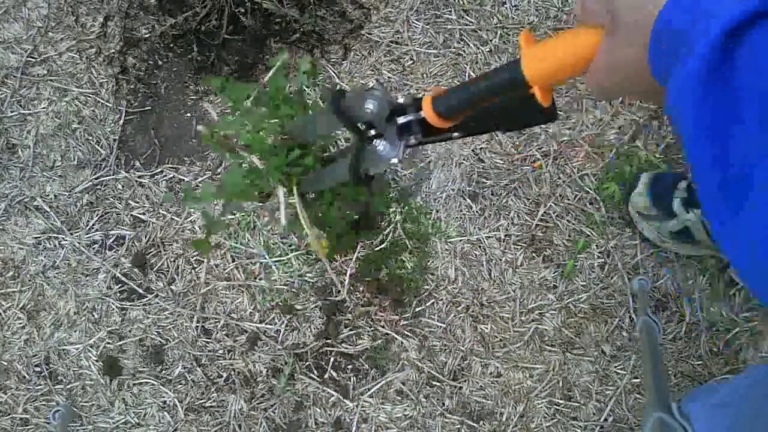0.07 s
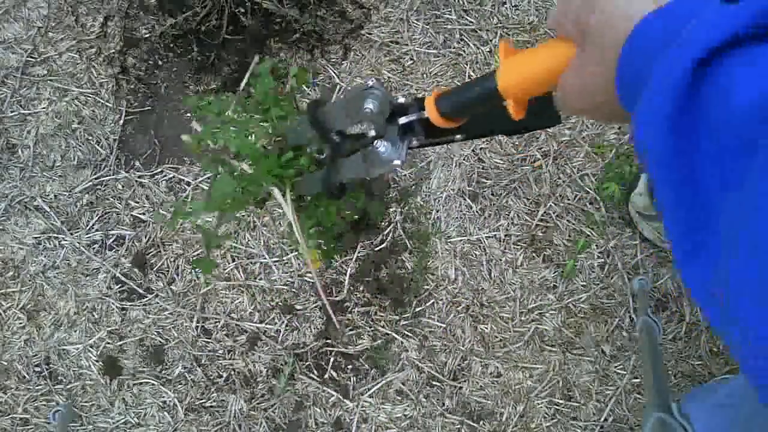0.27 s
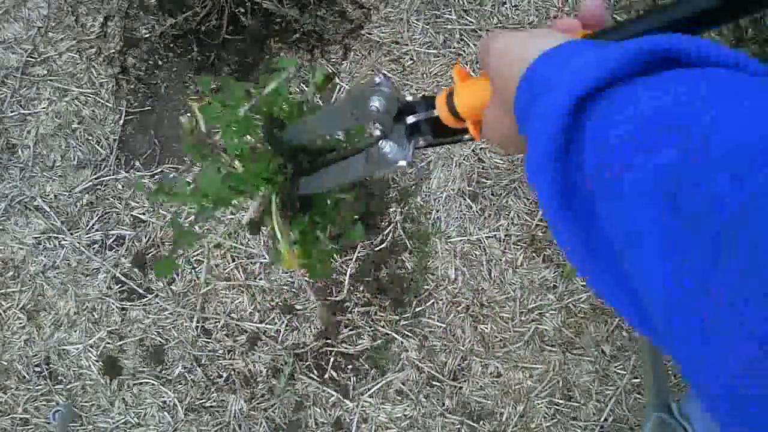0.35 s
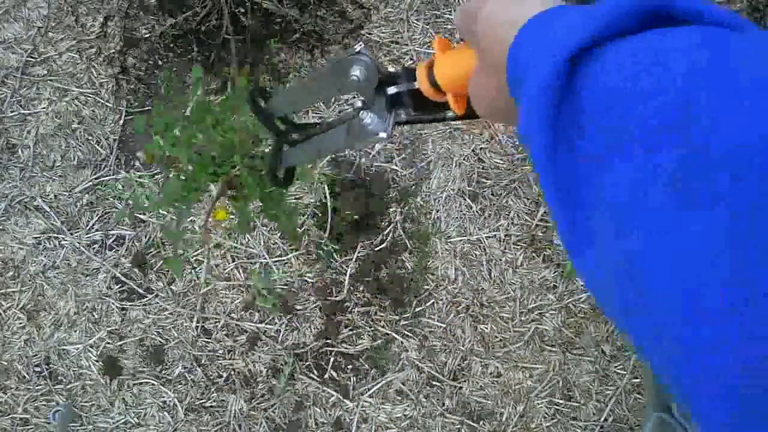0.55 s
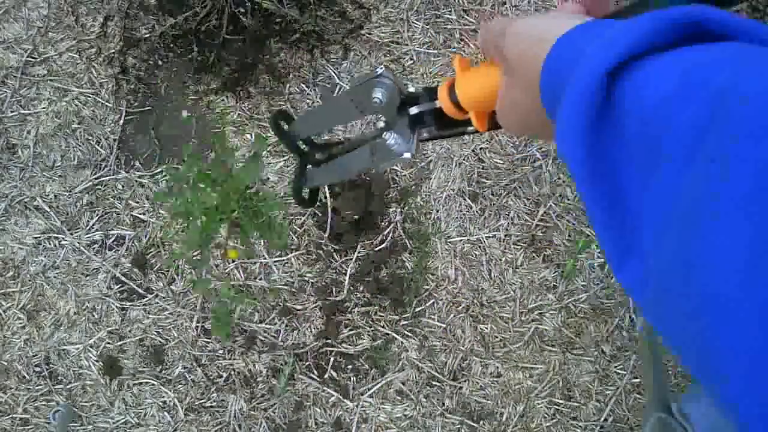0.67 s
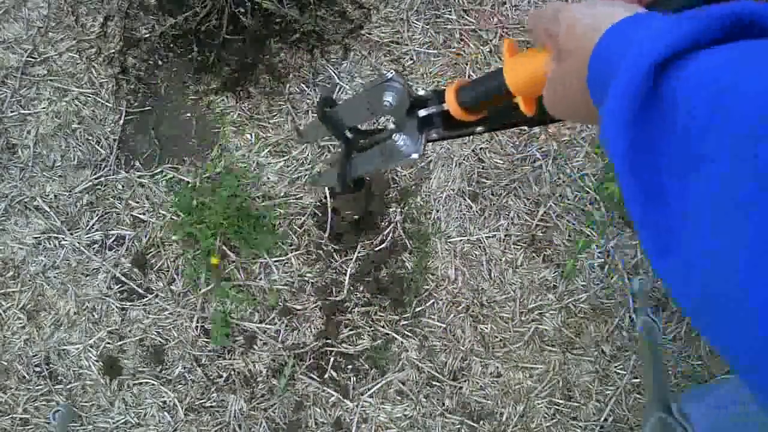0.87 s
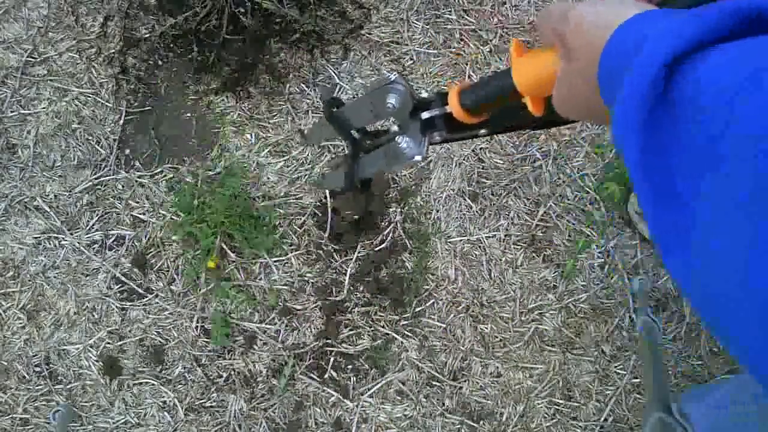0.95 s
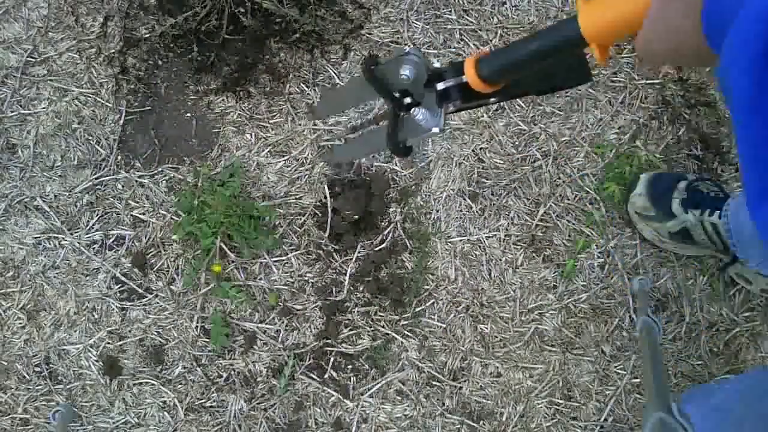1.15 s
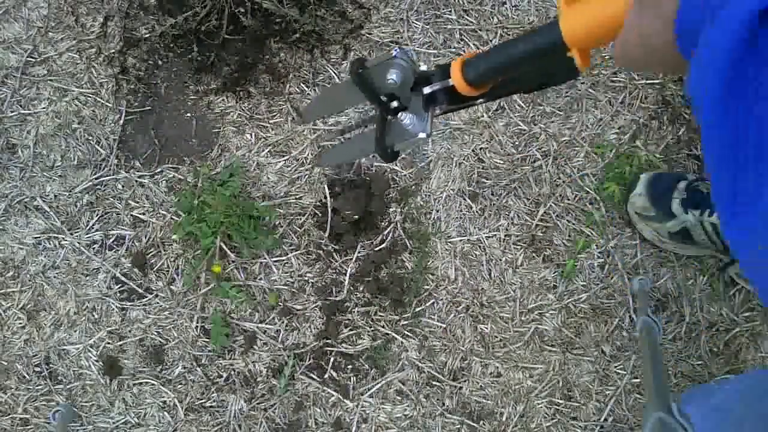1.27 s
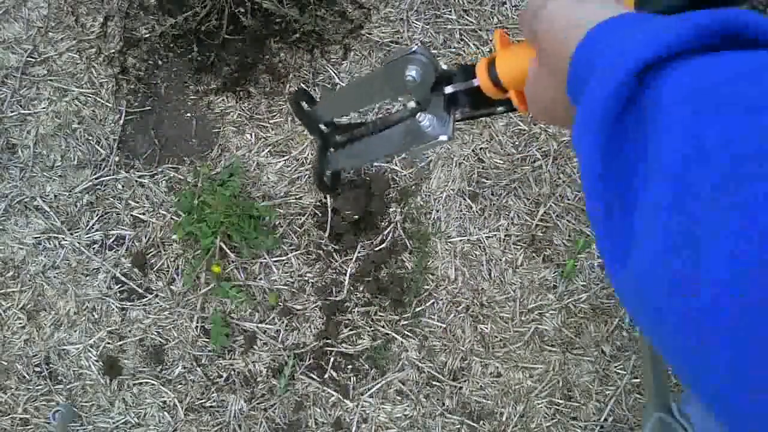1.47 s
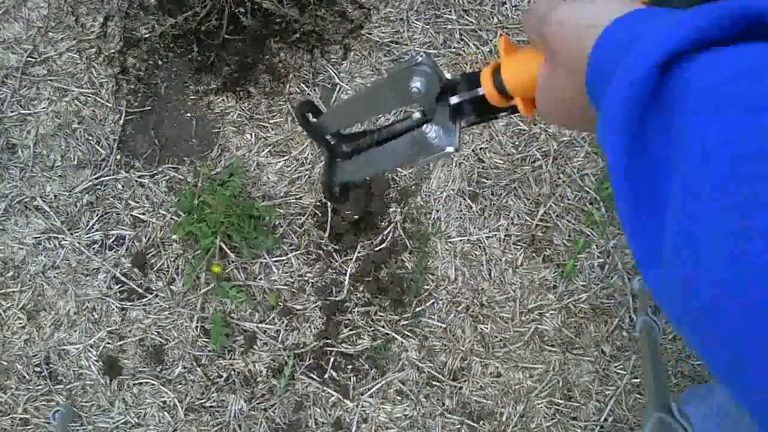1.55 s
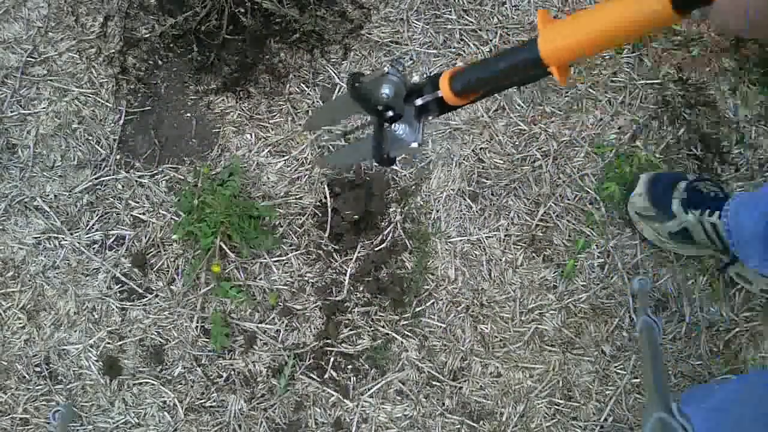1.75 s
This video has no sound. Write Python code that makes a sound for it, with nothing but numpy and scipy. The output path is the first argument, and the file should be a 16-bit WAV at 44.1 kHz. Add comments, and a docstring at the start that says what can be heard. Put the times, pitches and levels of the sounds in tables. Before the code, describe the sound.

A metal stand-up weeder's sliding grip clacks hard four times, with scraping hisses and rattles outdoors

```python
"""Outdoors on dry grass, close to the microphone, a steel stand-up weeder is pumped twice.
Its grip hisses along the shaft (patchy coloured noise) and slams or latches (short modes and noise bursts).
Loose parts rattle (short noise bursts) and the shaft rings on (damped sines); the last latch has a squeak.
The weed and its soil drop as low sine thuds and ticks of noise; a faint blur widens the tool over quiet air.
The four hard clacks overload the recorder, which limits and clips them."""
import sys
import numpy as np
from scipy import signal
from scipy.fft import rfft, irfft, next_fast_len
from scipy.io import wavfile
from scipy.ndimage import uniform_filter1d, minimum_filter1d, map_coordinates

SR = 44100
rng = np.random.default_rng(int(sys.argv[2]) if len(sys.argv) > 2 else 0)


def transcribe(u):
    """Save the signal u as a 16-bit wav file named by the first command-line argument.

    u: samples, shape (n,) or (channels, n), limited to [-1, 1]; the rate is SR.
    q: integer samples, one column per channel.
    """
    v = np.clip(np.atleast_2d(u).T, -1, 1)
    q = np.round(v * 32767).astype(np.int16)
    wavfile.write(sys.argv[1], SR, q)


N = 79380  # samples, 1.8 s


def amp(db):
    """Amplitude factor of a level in dB."""
    return 10 ** (np.asarray(db) / 20)


def unit(x):
    """Scale a signal to rms 1."""
    return x / np.sqrt(np.mean(x ** 2) + 1e-20)


def fade(t, t60):
    """Exponential decay, 60 dB in t60 seconds."""
    return np.exp(-np.log(1000) * t / t60)


def tilted(hz, tilt_db):
    """Gain of a slope in dB per octave about 4 kHz, level below 1500 Hz."""
    return amp(tilt_db * np.log2(np.maximum(hz, 1500) / 4000))


def filtered(x, response):
    """Multiply the spectrum of x by a response of frequency, padded against wrap-around."""
    n = x.shape[-1]
    padded = next_fast_len(n + 8192)
    spectrum = rfft(x, padded) * response(np.fft.rfftfreq(padded, 1 / SR))
    return irfft(spectrum, padded)[..., :n]


def noise(spectrum, size, tilt_db=0):
    """Noise of rms 1, coloured by points of f/Hz and level/dB joined over log frequency."""
    f, db = np.transpose(spectrum)

    def colour(hz):
        return amp(np.interp(np.log(hz + 1), np.log(f + 1), db)) * tilted(hz, tilt_db)

    return unit(filtered(rng.standard_normal(size), colour))


def patchy(x, depth_db):
    """Lay drifting patches of gain, some 700 Hz by 30 ms, over a sound."""
    z = signal.stft(x, nperseg=256)[2]
    field = uniform_filter1d(rng.standard_normal(z.shape), size=4, axis=0)  # across frequency
    field = uniform_filter1d(field, size=10, axis=1)  # across time
    return signal.istft(z * amp(depth_db * unit(field)), nperseg=256)[1][:N]


def add(track, s, sound):
    """Mix a sound into the track at time s, cut at the track's end."""
    part = track[round(s * SR):][:len(sound)]
    part += sound[:len(part)]


# colour of the outdoor air: f/Hz, level/dB (per Hz, relative)
AIR_COLOUR = [(15, -33), (25, 8.5), (93, -3.5), (318, -7), (450, -6.5), (833, -11.5), (903, -12.5),
              (1030, -12), (1350, -16), (1460, -16.5), (2180, -25), (3730, -23.5), (4870, -26.5),
              (12800, -26.5), (15000, -37)]
AIR_DB = -50
AIR_SIDE_DB = -21  # relative to AIR_DB


def air():
    """Quiet outdoor air: steady coloured noise, with a fainter independent side signal for width."""
    mid = amp(AIR_DB) * noise(AIR_COLOUR, N)
    side = amp(AIR_DB + AIR_SIDE_DB) * noise(AIR_COLOUR, N)
    return np.array([mid + side, mid - side])


# soft thuds of soil and handling: t/s, level/dB (before doubling), f/Hz, t60/s
THUD_EVENTS = [(.004, -43, 152, 0.036), (0.1, -43.5, 139, 0.097), (.133, -40.5, 125.3, 0.061),
               (0.155, -37, 192, 0.033), (0.2395, -49, 200, 0.032), (0.3392, -26.5, 270, 0.015),
               (0.3547, -33, 195, 0.035), (0.368, -36, 130, 0.058), (0.409, -44, 113, 0.1),
               (0.602, -33.5, 143.5, 0.038), (.674, -37.5, 138, 0.039), (1.134, -47, 112, 0.11),
               (1.455, -44.5, 89, 0.095), (1.504, -38.5, 127, 0.046)]
THUD_RISE_S = 0.00086  # time constant of the onset


def thuds():
    """Soft low bumps, damped sines with a rounded onset; the strongest are the root ball landing."""
    out, t = np.zeros(N), np.arange(SR // 4) / SR
    onset = 1 - np.exp(-t / THUD_RISE_S)
    for s, db, hz, t60 in THUD_EVENTS:
        bump = np.sin(2 * np.pi * hz * t) * fade(t, t60) * onset
        add(out, s, 2 * amp(db) * bump)
    return out


# the grip slides on the shaft, one list a stroke: t/s, hiss level/dB, hollow midrange level/dB
GRIP_STROKES = [
    [(.14, -60, -70), (.185, -46.5, -49.5), (.203, -30.5, -41.5), (.24, -29, -35), (.26, -41, -43),
     (.33, -65, -44), (.5, -57.5, -60.5)],
    [(.62, -56, -59.5), (.665, -45.5, -51.5), (.69, -38.5, -46.5), (.715, -42.5, -52), (.79, -46.5, -50),
     (.86, -58.5, -65)],
    [(.875, -65, -72), (.905, -49, -53.5), (.932, -38, -42), (.96, -34, -50.5), (.98, -47, -52),
     (1.02, -49, -81), (1.07, -69, -64)],
    [(1.2, -59, -66), (1.225, -45.5, -49), (1.255, -31.5, -31.5), (1.28, -36.5, -41.5), (1.305, -42, -46),
     (1.345, -85, -51)],
    [(1.465, -67, -57), (1.495, -44.5, -50), (1.55, -35.5, -39), (1.6, -34.5, -78), (1.66, -36, -40.5),
     (1.71, -41.5, -59), (1.8, -41, -56)],
]
# colour of the hiss before its treble filter: f/Hz, level/dB (per Hz, relative)
HISS_COLOUR = [(1760, -45), (3000, 4), (3610, -13), (4090, -13), (7430, 0.5), (8010, 0), (8640, 0),
               (11000, -3.5), (12300, -5), (14800, -8.5), (15500, -14.5)]
# colour of the hollow tube: f/Hz, level/dB (per Hz, relative)
HOLLOW_COLOUR = [(300, -25.5), (900, -3), (1600, -3), (2200, -3), (3200, -3), (4300, -0.5), (6300, 1),
                 (8000, -25), (14000, -14.5)]
HISS_EDGE_HZ = 5800  # the hiss is 6 dB down here
PATCH_DB = 1.6  # rms depth of the gain patches
GRIT_DB, GRIT_RATE = 1.5, 260  # scatter of the level in dB, random points per second


def slide():
    """Plastic rubs on the gritty shaft: a bright hiss over the hollow sound of the tube."""
    t = np.arange(N) / SR
    hiss_gain, hollow_gain = np.zeros(N), np.zeros(N)
    for stroke in GRIP_STROKES:
        s, hiss_db, hollow_db = np.transpose(stroke)
        to_edge = np.minimum(t - s[0], s[-1] - t)
        inside = np.clip(to_edge / .02 + 1, 0, 1)  # 20 ms ramps outside the stroke
        hiss_gain += inside * amp(np.interp(t, s, hiss_db))
        hollow_gain += inside * amp(np.interp(t, s, hollow_db))
    hiss = patchy(noise(HISS_COLOUR, N), PATCH_DB)
    hiss = unit(filtered(hiss, lambda hz: hz ** 2 / (hz ** 2 + HISS_EDGE_HZ ** 2)))
    hollow = patchy(noise(HOLLOW_COLOUR, N), PATCH_DB)
    roughness = map_coordinates(rng.standard_normal(N // 10), [t * GRIT_RATE], mode="wrap")
    grit = unit(amp(GRIT_DB * roughness))
    return grit * (hiss_gain * hiss + hollow_gain * hollow)


# loose parts rattle and bounce: t/s, level/dB, tilt/dB per octave, t60/s
RATTLE_EVENTS = [(0.1536, -35.5, -6.5, 0.013), (0.2032, -30.5, -1, 0.016), (0.2712, -18.5, -1, .022),
                 (0.2847, -27, -16, 0.023), (0.291, -26, 7, .03), (0.3052, -27.5, -16, 0.038),
                 (0.3097, -25, 7, .015), (0.354, -35.5, 2, 0.027), (.3655, -36.5, -3, 0.03),
                 (0.61, -39, 13, 0.036), (.6175, -30, 24, .008), (.692, -42.5, -11, 0.01),
                 (0.7223, -41, 9, .01), (0.9747, -36, 5, .012), (.997, -40, 2, 0.035),
                 (1.2552, -17, -2.5, 0.011), (1.296, -20, 17, 0.036), (1.3184, -21.5, -4.5, 0.028),
                 (1.3565, -19.5, 14, 0.0075), (1.367, -31.5, -3, 0.009), (1.386, -38.5, -11, 0.025),
                 (1.4005, -38.5, -7, 0.027), (1.4125, -40, -9, 0.024), (1.5597, -21, -1, 0.0091),
                 (1.5785, -17, -15, 0.0035), (1.608, -29.5, 2, 0.038), (1.638, -34.5, -4, .04),
                 (1.651, -27, 17, 0.028), (1.665, -32, 14, .02)]
# colour of a small contact before tilting: f/Hz, level/dB (per Hz, relative)
RATTLE_COLOUR = [(200, -40.5), (800, -18.5), (1500, 0.5), (2200, -2.5), (3200, 4.5), (4300, 6),
                 (5500, -5.5), (8500, -1), (12000, -7.5), (15000, -15.5)]


def rattles():
    """Small contacts of claws, linkage and grit: decaying noise bursts, each dull or bright."""
    out, t = np.zeros(N), np.arange(SR // 10) / SR
    for s, db, tilt_db, t60 in RATTLE_EVENTS:
        burst = noise(RATTLE_COLOUR, len(t), tilt_db) * fade(t, t60)
        add(out, s, amp(db) * burst)
    return out


CRUMB_START_S, CRUMB_SPREAD_S, CRUMB_T60 = 0.17, 0.14, 0.011
CRUMB_DB, CRUMB_SCATTER_DB = -39.5, 3  # level before the later ones grow fainter, and its scatter


def crumbs(count=30):
    """Crumbs shaken off the claws patter on the dry grass as noise ticks, ever fewer and fainter."""
    out, t = np.zeros(N), np.arange(SR // 50) / SR
    for wait, size, tilt_db in rng.standard_normal((count, 3)):
        wait = abs(wait)
        tick = noise(RATTLE_COLOUR, len(t), tilt_db) * fade(t, CRUMB_T60)
        level = amp(CRUMB_DB + CRUMB_SCATTER_DB * size) * np.exp(-wait / 2)
        add(out, CRUMB_START_S + CRUMB_SPREAD_S * wait, level * tick)
    return out


# where a blow can strike, in the order of the level columns of the modes
STRIKE_PLACES = ["full claws", "empty claws", "latch"]
WANDER_RATE = 120  # random phase points per second


def ring(modes, place, t, length, wander):
    """Damped sines driven as the struck place allows; loose joints make their phase wander (radians)."""
    column, out = STRIKE_PLACES.index(place), np.zeros(len(t))
    for k, (hz, t60, *levels) in enumerate(modes):
        drift = map_coordinates(rng.standard_normal(len(t) // 100), [t * WANDER_RATE])
        sine = np.sin(2 * np.pi * hz * t + wander * drift)
        polarity = (-1) ** k
        out += polarity * amp(levels[column]) * fade(t, t60 * length) * sine
    return out


# hard contacts and their rebounds: t/s, place struck, level/dB, length of the blow (factor), ring level/dB
BLOW_EVENTS = [(.2413, "full claws", 3.5, 1.31, -31.5), (0.2751, "full claws", -16, 0.9, -40.5),
               (0.9636, "latch", -2.5, 0.87, -50.5), (1.2877, "empty claws", 2, 1.2, -32),
               (1.3221, "empty claws", -21, 1.5, -51), (1.5744, "latch", 2, 0.96, -40.5)]
# short modes of head and grip: f/Hz, t60/s (before the length factor), level/dB for each place
HEAD_MODES = [(850, .005, -28, -18, -34), (1480, .014, -15, -14, -32), (1690, .015, -11, -9, -26),
              (2150, .008, -18, -10, -17), (2650, .009, -13, -9, -13), (3600, .008, -13, -6, -12),
              (4290, .01, -1, -17, -16), (6600, .006, -9, -9, -3), (7050, .008, -18, -20, -1),
              (7500, .008, -14, -11, -4), (8400, .011, -9, -15, -18), (10300, .005, -6, -9, -9),
              (11900, .006, -10, -8, -17), (14000, .005, -7, -16, -13)]
# long modes of the shaft: f/Hz, t60/s, level/dB for each place
SHAFT_MODES = [(1405, .34, -12, -15, -25), (1696, .46, 0, -9, -18), (2939, .38, -4, -3, -3),
               (2972, .18, -11, 3, -7), (3500, .16, -13, -8, -5), (4215, .34, -4, -11, -12),
               (4452, .38, -9, -15, -14), (5798, .25, -18, -18, -18), (6900, .12, -16, -11, -7),
               (8400, .14, -6, -11, -8), (8630, .14, -7, -16, -6), (9259, .1, -12, -7, -12)]
# colour of the crack: f/Hz, level/dB (per Hz, relative)
CRACK_COLOUR = [(100, -32), (400, -17), (900, -7), (1700, -2), (3000, 1), (4200, 0), (5000, -4), (6000, 0),
                (10000, 1), (15000, -1)]
# dense shudder of the whole tool: f/Hz, level/dB (per Hz, relative)
SHUDDER_COLOUR = [(200, -40), (800, -2.5), (1200, -11.5), (1650, -2), (2200, -0.5), (3000, 4.5), (3600, 0),
                  (4350, -20), (5200, -4), (7000, -7.5), (8500, -2.5), (12000, -12.5), (15000, -13)]
RING_S, RING_WANDER = .7, .7  # seconds computed; phase wander in radians
# levels relative to the blow, t60 before its length factor
CRACK_DB, CRACK_T60 = -8, .01
SHUDDER_DB, SHUDDER_T60 = -20.5, 0.042
TAIL_DB, TAIL_T60 = -3, 0.46  # level relative to the ring, t60 as it is


def clacks():
    """A hard contact: short modes and a crack, then the tool shudders and the shaft rings on."""
    out, t = np.zeros(N), np.arange(int(RING_S * SR)) / SR
    for s, place, db, length, ring_db in BLOW_EVENTS:
        contact = ring(HEAD_MODES, place, t, length, wander=0)
        crack = amp(CRACK_DB) * noise(CRACK_COLOUR, len(t)) * fade(t / length, CRACK_T60)
        shudder = amp(SHUDDER_DB) * noise(SHUDDER_COLOUR, len(t)) * fade(t / length, SHUDDER_T60)
        shaft = ring(SHAFT_MODES, place, t, 1, RING_WANDER)
        tail = amp(TAIL_DB) * noise(SHUDDER_COLOUR, len(t)) * fade(t, TAIL_T60)
        blow = amp(db) * (contact + crack + shudder)
        add(out, s, blow + amp(ring_db) * (shaft + tail))
    return out


SQUEAK_S, SQUEAK_HZ, SQUEAK_DB, SQUEAK_WIDTH_S = 1.568, 9240, -18.5, 0.0034


def squeak():
    """A tiny high squeak just before the last latch: a sine under a bell-shaped envelope."""
    t = np.arange(N) / SR - SQUEAK_S
    bell = np.exp(-(t / SQUEAK_WIDTH_S) ** 2)
    return amp(SQUEAK_DB) * bell * np.sin(2 * np.pi * SQUEAK_HZ * t)


BLUR_DB, BLUR_T60 = -29, .03


def width_blur(x):
    """A faint, short blur of decaying noise, different in each channel, widens the tool's sound."""
    t = np.arange(SR // 20) / SR
    blur = rng.standard_normal((2, len(t))) * fade(t, BLUR_T60)
    blur /= np.linalg.norm(blur[0])
    return amp(BLUR_DB) * signal.fftconvolve(x[None], blur, axes=1)[:, :N]


def scene():
    """The tool and thuds in the centre, over quiet outdoor air; only the tool is blurred."""
    tool = slide() + rattles() + crumbs() + clacks() + squeak()
    return air() + thuds() + tool + width_blur(tool)


LIMIT, LIMITER_S = 1.64, .0007  # the limiter's peak target lies above full scale, 1
NOTCH_HZ, NOTCH_WIDTH_HZ, NOTCH_DEPTH = 7880, 150, .85  # depth: fraction removed at the centre
LOW_CUT_HZ, TOP_HZ = 156, 15300


def record(dry):
    """A very fast limiter and clipping catch the clacks; a narrow notch and cuts at both ends colour all."""
    size = int(LIMITER_S * SR)
    needed = 1 / np.maximum(np.abs(dry).max(axis=0) / LIMIT, 1)
    gain = uniform_filter1d(minimum_filter1d(needed, size), size)

    def notch(hz):
        band = 1j * hz * NOTCH_WIDTH_HZ
        return 1 - NOTCH_DEPTH * band / (NOTCH_HZ ** 2 - hz ** 2 + band)

    def low_cut(hz):
        return 1j * hz / (LOW_CUT_HZ + 1j * hz)

    def top_cut(hz):
        return np.clip((TOP_HZ - hz) / 400 + .5, 0, 1)  # 400 Hz wide slope

    clipped = np.clip(gain * dry, -1, 1)
    coloured = filtered(clipped, lambda hz: notch(hz) * low_cut(hz))
    return filtered(np.clip(coloured, -1, 1), top_cut)


dry = scene()
out = record(dry)
transcribe(out)
```